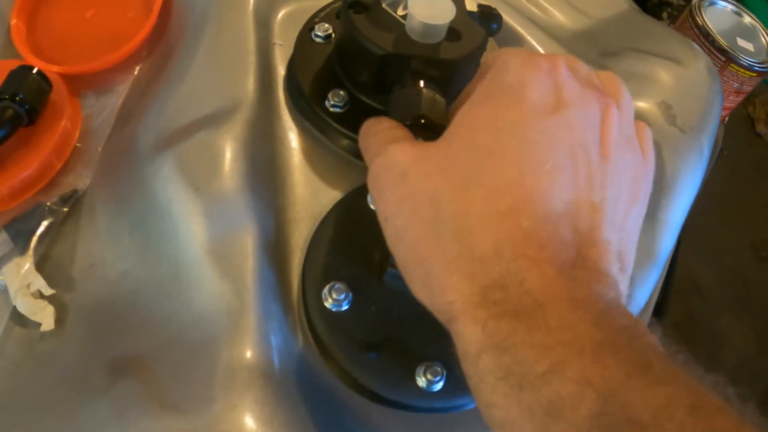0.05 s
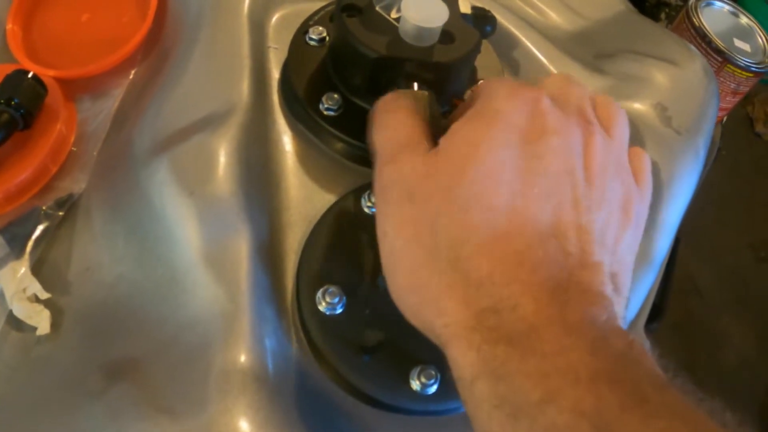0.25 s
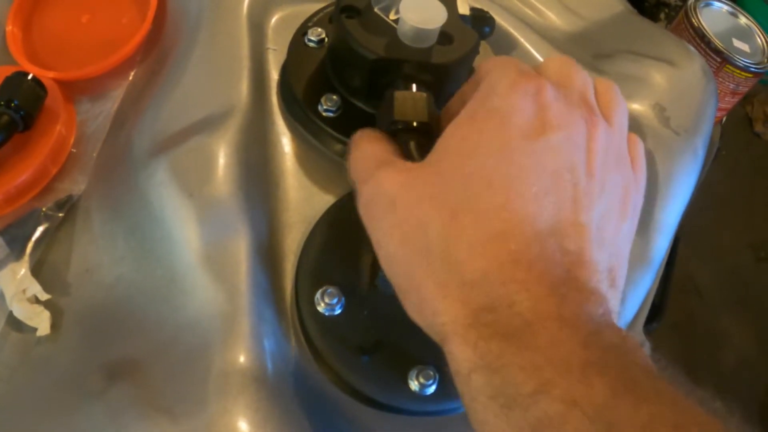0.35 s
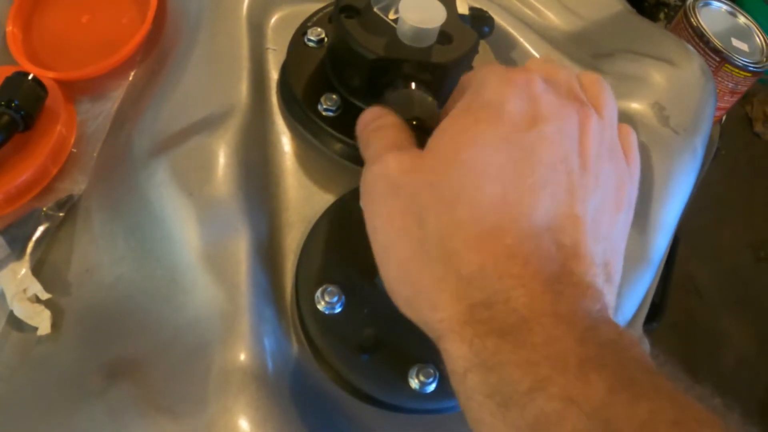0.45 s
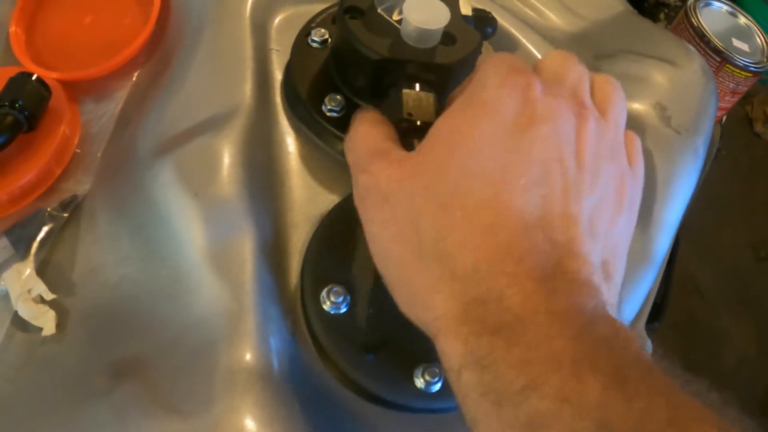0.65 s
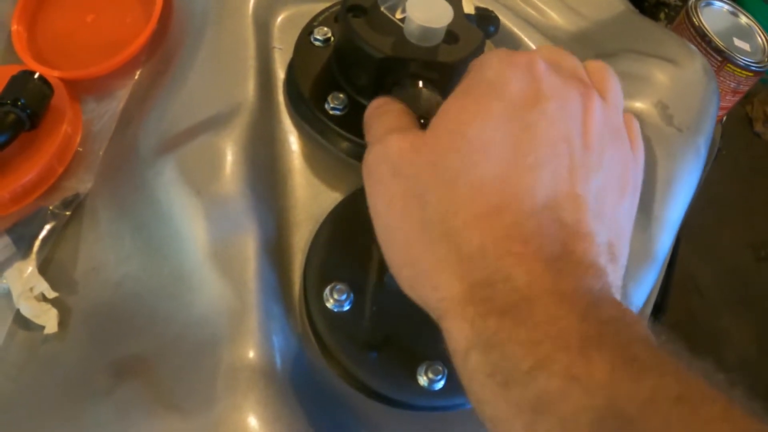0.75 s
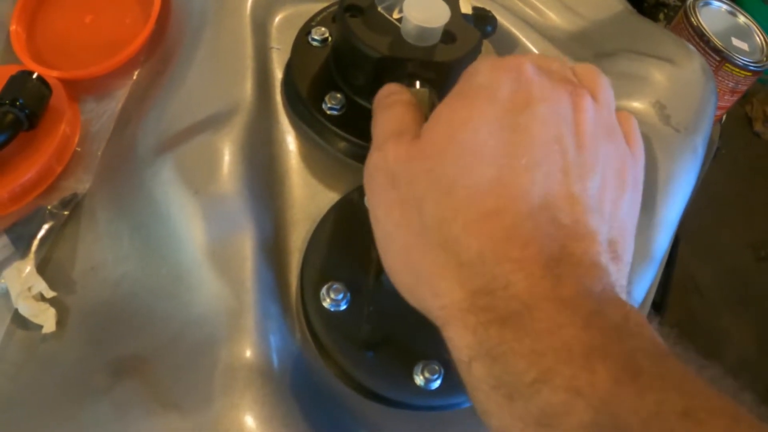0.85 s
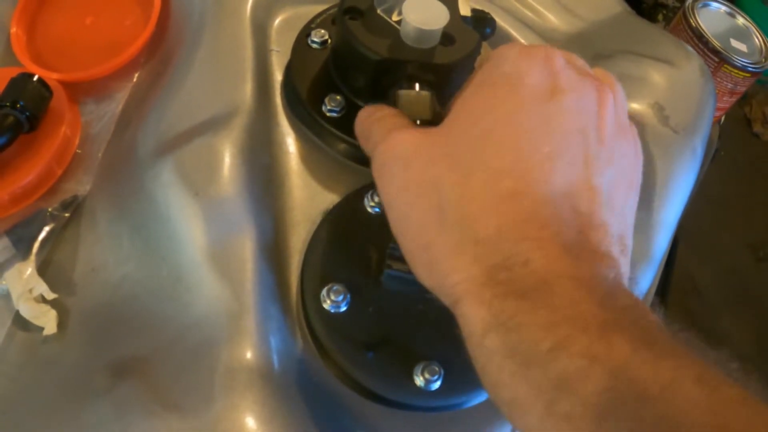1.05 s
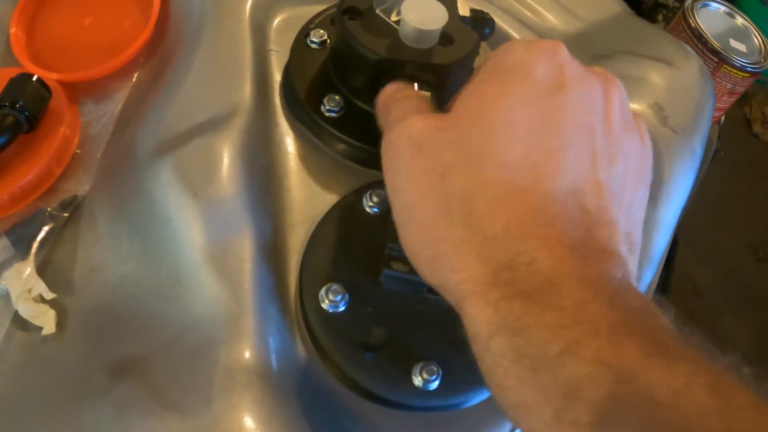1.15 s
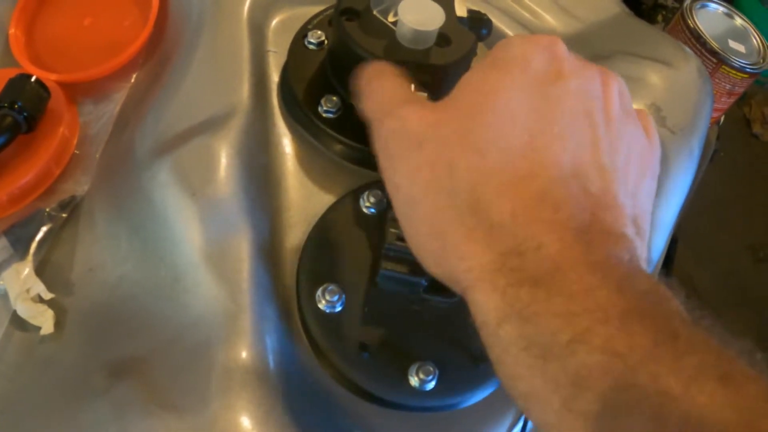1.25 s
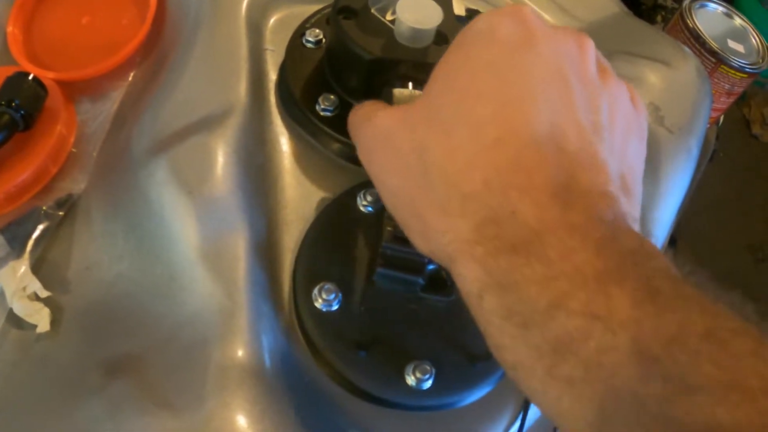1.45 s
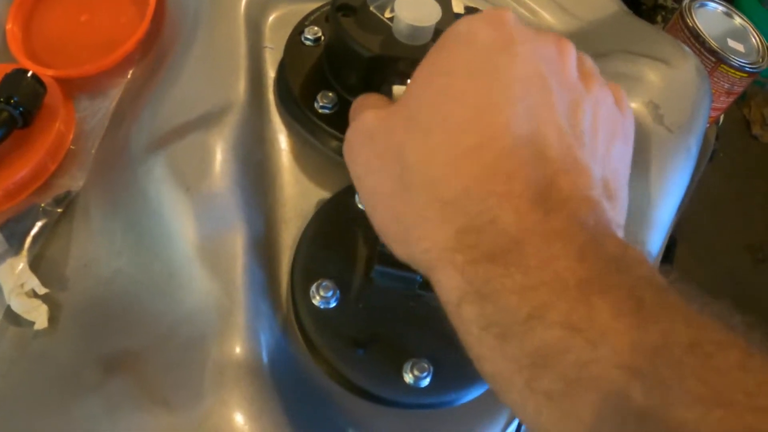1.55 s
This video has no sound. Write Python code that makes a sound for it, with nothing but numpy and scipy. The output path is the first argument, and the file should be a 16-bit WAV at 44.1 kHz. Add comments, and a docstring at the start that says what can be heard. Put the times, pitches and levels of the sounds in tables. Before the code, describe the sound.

Close up in a quiet workshop, plastic grates and catches twice as a hand turns a fitting, each snap ringing a hollow sheet-metal tank. Weaker thuds follow, then the hand slides off and lightly taps the cap.

```python
"""Plastic scrapes, catches and snaps round twice on a booming, empty sheet-metal fuel tank, heard up close.
A hand is twisting a fitting: tiny slips crackle, and each blow cracks in the plastic, rings the steel
walls and booms in the hollow. The hand keeps the tank rumbling softly, then slides off the cap and
taps it, over the low hum of a workshop."""
import sys
import numpy as np
from scipy import signal
from scipy.fft import rfft, irfft
from scipy.io import wavfile

SR = 44100
rng = np.random.default_rng(int(sys.argv[2]) if len(sys.argv) > 2 else 0)


def store_pcm(level_fs):
    """Save levels as 16-bit WAV."""
    pcm = np.round(np.clip(level_fs, -1, 1) * 32767).astype(np.int16)
    wavfile.write(sys.argv[1], SR, np.atleast_2d(pcm).T)


N = 70560
LEAD = SR // 4  # pre-roll in samples: the tank is already ringing from an earlier blow
TIME = np.arange(SR) / SR  # one second for each ring to die away

# modes of the steel walls (frequency [Hz], level [dB], t60 [s])
WALL_MODES = [(503.7, -42, .3), (629, -46.5, 0.82), (764, -37, .45), (794.4, -38.5, .65),
              (841.4, -40, 0.292), (887.5, -45, 0.99), (950, -34, 0.27), (1061.5, -31, .2),
              (1100, -48, 0.67), (1356, -34.5, 0.18), (1387, -30.5, 0.3), (1466, -28.5, .33),
              (1528, -34.5, 0.43), (1464, -40.5, 0.16), (1687, -34, 0.14), (1799, -37, .25),
              (1843, -40.5, 0.16), (2326, -44.5, 0.21), (2604, -40, 0.21), (2680, -40, .28),
              (2836, -40.5, 0.21), (3170, -48.5, .28), (4300, -41, 0.23), (4460, -52.5, 0.16)]
# tone of plastic grating on plastic (frequency [Hz], gain [dB])
GRIT_EQ = [(100, -20), (400, -5.5), (1000, -9.5), (1600, -12), (2000, -14.5), (2700, -17), (3400, -18),
           (4150, -12), (4700, -15.5), (5200, -16), (6000, -22.5), (8000, -26.5), (9500, -37), (11000, -32),
           (12200, -21), (13300, -32), (15000, -47)]


def knocks(grip_from_s=.59, grip_db_per_s=68):
    """Each blow ticks and cracks in the fitting, rings the walls and pushes the air in the hollow."""
    # blows on the fitting (time [s], strength [dB], ring high cut [Hz], boom gain [dB],
    # boom low cut [Hz], tick gain [dB], tick pitch [Hz])
    blows = [(-.21, 3, 2500, -1, 100, -45, 4400), (0.116, -27, 9000, -30, 247, -12, 4480),
             (0.1604, -24, 1616, -36.5, 300, -32, 4500), (0.1683, -22, 9000, -34, 300, -8.5, 5000),
             (0.1807, -23, 9000, -44, 200, -9, 7740), (0.186, -22.5, 5000, -19, 200, -27, 4300),
             (.2200, 3, 12000, -0.5, 40, -4, 5420), (.4790, -19.5, 7000, -21, 300, -20.5, 4440),
             (.5095, -15, 1500, -10.5, 250, -36, 4500), (0.5155, -22, 9000, -32, 250, -2, 3820),
             (.5270, -27, 6000, -23, 100, -16, 4350), (.5506, -23, 7000, -29, 300, -6.5, 4150),
             (.6018, -4.5, 3500, -7, 281, -22, 3900), (0.8251, -29, 2450, -26, 350, -39, 4800),
             (.833, -30, 1580, -26, 355.7, -35, 4800), (.8860, -50, 9000, -18.5, 166, -25, 4800),
             (0.9756, -43, 6000, -30.5, 200, -33, 4200)]
    out = np.zeros((2, N + LEAD))
    ring = crack() + modes(WALL_MODES) + dense_ring()
    boom = hollow_boom()
    for start, db, high_cut, boom_db, low_cut, tick_db, tick_hz in blows:
        thud = signal.lfilter(*signal.butter(2, low_cut, "high", fs=SR), boom)
        grip = amp(-grip_db_per_s * TIME * (start > grip_from_s))  # the tightened hand chokes later blows
        clang = amp(db) * grip * dull(ring, high_cut)
        add(out, start, clang + amp(boom_db) * thud + amp(tick_db) * tick(tick_hz))
    return out[:, LEAD:]


def tick(hz, puff_db=-10.5, puff_t60=0.021, ping_db=-27, ping_t60=0.02):
    """Hard edges meet: a puff of grit and one brief high ping."""
    puff = colour(stereo_noise(N=SR), GRIT_EQ) * amp(puff_db - 60 * TIME / puff_t60)
    return puff + modes([(hz, ping_db, ping_t60)])


def crack(side_db=-13, echo_cut_hz=2400):
    """The plastic fitting rings briefly, followed by its first, duller echoes."""
    # modes of the fitting (frequency [Hz], level [dB], t60 [s])
    fitting_modes = [(1058, -14.5, 0.011), (1380, -15, 0.025), (1605, -14.5, .022), (2207, -15, 0.0074),
                     (2624, -15.5, 0.013), (3250, -17.5, 0.0051), (4150, -20.5, 0.0077), (4720, -30, 0.015),
                     (8500, -40.5, 0.0029), (12100, -41, 0.011)]
    # reflections off nearby surfaces (delay [s], gain [dB])
    echoes = [(0.0107, -18.5), (0.0186, -10)]
    direct = modes(fitting_modes)
    reflected = dull(direct, echo_cut_hz)
    mid = direct + sum(amp(db) * np.roll(reflected, round(delay * SR)) for delay, db in echoes)
    side = amp(side_db) * unit(np.gradient(mid)) * mid.std()
    return np.array([mid - side, mid + side])


def hollow_boom(rise_s=.005):
    """The air inside the tank swells into a low boom."""
    # modes of the hollow (frequency [Hz], level [dB], t60 [s])
    air_modes = [(80.3, -25, .22), (143.1, -17.5, 0.18), (174.4, -25, 0.53), (186.4, -14.5, 0.15),
                 (262.4, -37, 0.75), (292, -27, .4), (318, -25.5, 0.14), (347.4, -36.5, 0.56),
                 (394, -28.5, 0.33)]
    return modes(air_modes) * (1 - np.exp(-TIME / rise_s))


def dense_ring(rise_s=0.0011):
    """Countless weak modes and reflections blur into a wash, each band dying at its own speed."""
    # bands of tank and room ring (centre [Hz], level [dB], t60 [s])
    bands = [(69, -22.5, .5), (221.7, -19.5, .4), (360, -17.5, 0.36), (438.5, -21.5, .45),
             (802, -21.5, 0.65), (1160, -19, .36), (1600, -13.5, 0.48), (2010, -30, 0.46),
             (2695, -26, 0.49), (3580, -23.5, 0.12), (4175, -31.5, 0.47), (5800, -43.5, 0.36),
             (7950, -39, 0.15), (10100, -57.5, 0.1), (12300, -42.5, .2), (15000, -75, 0.18)]
    centres, levels, t60s = np.transpose(bands)
    hz = np.fft.rfftfreq(SR, 1 / SR)
    spectrum = rfft(stereo_noise(SR)) * amp(curve_at(list(zip(centres, levels)), hz))
    wash = 0
    for solo, t60 in zip(np.eye(len(bands)), t60s):
        crossfade = curve_at(list(zip(centres, solo)), hz)
        wash = wash + irfft(spectrum * crossfade, SR) * amp(-60 * TIME / t60)
    return wash * (1 - np.exp(-TIME / rise_s))


def scrapes(grit_db=-14.5, body_db=-51, room_db=-8, room_t60=0.15):
    """Slipping plastic crackles at the contact, spills into the room and shakes the walls."""
    slips = stick_slip()
    grit = amp(grit_db) * colour(spread(*slips), GRIT_EQ)
    room_tail = unit(rng.standard_normal((2, SR)) * amp(-60 * TIME / room_t60)) / np.sqrt(SR)
    room = signal.fftconvolve(grit, room_tail, axes=1)[:, :N]
    body = signal.fftconvolve(slips[:1], modes(WALL_MODES) + dense_ring(), axes=1)[:, :N]
    return grit + amp(room_db) * room + amp(body_db) * body


def stick_slip(slips_per_s=3000, spread_db=4, rise_s=0.0017, release_s=0.0091):
    """Each stroke of the twist is a train of tiny, uneven slips, in mid and side."""
    # strokes of plastic on plastic (start [s], length [s], level [dB], high cut [Hz])
    strokes = [(0.084, 0.0324, -23, 12000), (0.123, 0.039, -12.5, 4830), (0.164, 0.034, -6.5, 13700),
               (0.187, 0.049, -10, 8900), (0.478, 0.013, -4.5, 12000), (0.493, 0.033, -13.5, 11200),
               (.515, .043, -6.5, 11200), (0.547, 0.11, -17.5, 5040), (0.669, 0.031, -20.5, 5540),
               (0.81, 0.045, -24, 11100), (0.844, 0.06, -27.5, 9000), (0.886, 0.0094, -16.5, 6500),
               (0.952, 0.061, -31, 6170)]
    train = (rng.random((2, N)) < slips_per_s / SR) * rng.choice([-1, 1], (2, N))
    train = train * amp(spread_db * np.minimum(rng.exponential(1, (2, N)), 4))
    out = np.zeros((2, N + LEAD))
    for start, length, db, high_cut in strokes:
        t = np.arange(0, length, 1 / SR)
        envelope = np.minimum(t / rise_s, 1) * np.minimum((length - t) / release_s, 1)
        burst = unit(train[:, round(start * SR):][:, :len(t)])
        add(out, start, dull(amp(db) * envelope * burst, high_cut))
    return out[:, LEAD:]


def palm_rub(gain_db=-41.5):
    """The palm drags on the tank and makes it rumble."""
    # pressure of the hand (time [s], level [dB])
    pressure = [(0, -10), (.08, -7), (.13, 4.5), (.21, 0), (.44, -12.5), (.5, -3), (.535, 6), (.59, -0.5),
                (.77, -16), (.84, 4.5), (.875, -16.5), (.905, 1), (1., -17.5), (1.14, -9.5), (1.22, -18),
                (1.3, -9), (1.42, -20.5), (1.6, -23)]
    # modes of the rubbed tank (frequency [Hz], relative level [dB], t60 [s])
    rub_modes = [(87.7, -1.5, 0.34), (125, -5.5, .15), (198.4, 3, 0.22), (240.3, 3.5, 0.11),
                 (281.2, -2.5, 0.27), (387.6, -1.5, 0.17)]
    drag = dull(rng.standard_normal(N) * fader(pressure), hz=506)
    resonance = unit(modes(rub_modes)) / np.sqrt(SR)
    return amp(gain_db) * signal.fftconvolve(drag, resonance)[:N]


def skin_slide():
    """Skin hisses as it slides off the cap."""
    # swell of the slide (time [s], level [dB])
    swell = [(1.06, -89), (1.12, -71.5), (1.19, -72), (1.23, -60.5), (1.25, -63), (1.268, -54),
             (1.283, -61.5), (1.3, -65), (1.36, -88)]
    # tone of skin friction (frequency [Hz], relative level [dB])
    skin_eq = [(500, -17), (1300, -6.5), (2200, -10), (3300, -7.5), (3850, 3), (4400, -8), (5000, -3.5),
               (6500, -16.5), (10000, -26), (12300, -25), (15000, -39)]
    return fader(swell) * unit(colour(stereo_noise(N), skin_eq))


def finger_taps():
    """Light touches of the fingers ring the cap."""
    # touches (time [s], gain [dB])
    taps = [(1.148, -66), (1.3165, -55)]
    # modes of the cap (frequency [Hz], level [dB], t60 [s])
    cap_modes = [(348, -1, 0.15), (457, 5, .22), (535, 6, 0.12), (639, -0.5, 0.2), (715, -3.5, 0.22),
                 (1073, 0, 0.084), (1327, -6, 0.15), (1800, 3, 0.043), (1930, -7, 0.029)]
    out = np.zeros(N + LEAD)
    for start, db in taps:
        add(out, start, amp(db) * modes(cap_modes))
    return out[LEAD:]


def workshop(air_db=-52, hum_hz=40, hum_db=-57):
    """Steady room tone with a low hum."""
    # spectrum of the room tone (frequency [Hz], relative level [dB])
    room_eq = [(15, -22.5), (25, -5.5), (128, -3), (167, -0.5), (191, -17), (326, -10), (543, -29.5),
               (903, -33), (1240, -27), (1630, -34), (2630, -39), (3440, -32.5), (3930, -37), (5570, -36),
               (7680, -44.5), (8320, -51.5), (15000, -62.5)]
    hum = np.sqrt(2) * np.sin(2 * np.pi * (hum_hz * np.arange(N) / SR + rng.random()))
    air = unit(colour(stereo_noise(N), room_eq))
    return amp(air_db) * air + amp(hum_db) * hum


def modes(table):
    """Dying sines; neighbours swing in opposite directions."""
    return sum((-1) ** k * amp(db - 60 * TIME / t60) * np.sin(2 * np.pi * hz * TIME)
               for k, (hz, db, t60) in enumerate(table))


def spread(mid, side):
    """Left and right: bass in the middle, treble wider."""
    # stereo width (frequency [Hz], side gain [dB])
    width = [(100, -21.5), (300, -9.5), (700, -8), (3000, -6), (12000, -8)]
    side = colour(side, width)
    return np.array([mid + side, mid - side])


def stereo_noise(N):
    """N samples of noise with the bass centred."""
    return spread(*rng.standard_normal((2, N)))


def dull(x, hz):
    """High cut: a softer contact loses its treble."""
    return signal.lfilter(*signal.butter(2, min(hz, .45 * SR), fs=SR), x)


def colour(x, eq):
    """Equalises by points of (frequency [Hz], gain [dB])."""
    n = x.shape[-1]
    return irfft(rfft(x) * amp(curve_at(eq, np.fft.rfftfreq(n, 1 / SR))), n)


def curve_at(points, hz):
    """Reads a curve on a log-frequency axis."""
    frequencies, values = np.transpose(points)
    return np.interp(np.log(hz + 1), np.log(frequencies), values)


def fader(points):
    """Gain that rides through points of (time [s], level [dB])."""
    return amp(np.interp(np.arange(N) / SR, *np.transpose(points)))


def add(track, start_s, sound):
    """Mixes a sound into a track that starts LEAD samples early."""
    part = track[..., max(round(start_s * SR) + LEAD, 0):][..., :sound.shape[-1]]
    part += sound[..., :part.shape[-1]]


def amp(db):
    """Decibels to gain."""
    return 10 ** (np.asarray(db) / 20)


def unit(x):
    """Scales to rms 1."""
    return x / np.sqrt(np.mean(x ** 2) + 1e-20)


def scene():
    """The fitting up front, the hand beneath it, the workshop behind."""
    return knocks() + scrapes() + palm_rub() + skin_slide() + finger_taps() + workshop()


def record(dry):
    """A steep high cut takes off the very top of the treble."""
    high_cut = signal.firwin(511, 15665, window=("kaiser", 9), fs=SR)
    return signal.oaconvolve(dry, high_cut[None], "same")


dry = scene()
out = record(dry)
store_pcm(out)
```